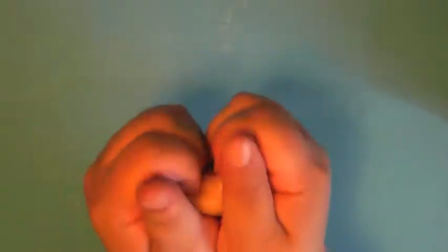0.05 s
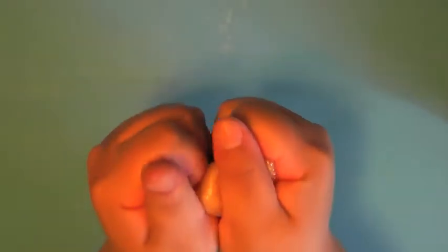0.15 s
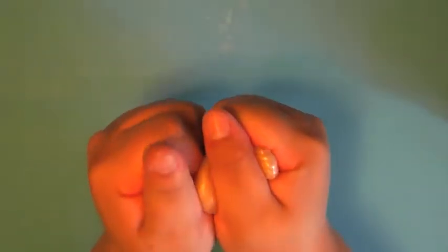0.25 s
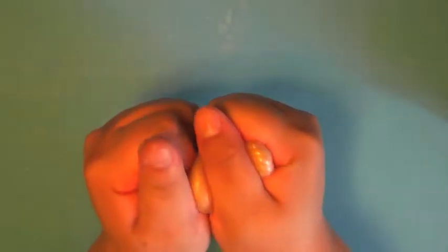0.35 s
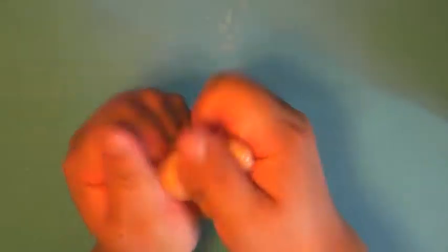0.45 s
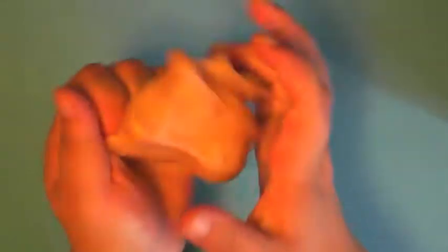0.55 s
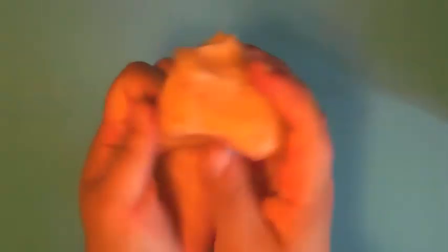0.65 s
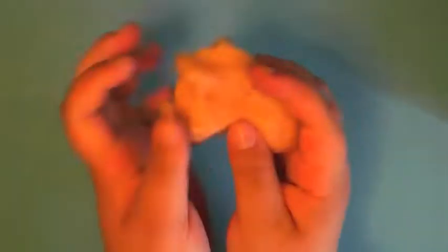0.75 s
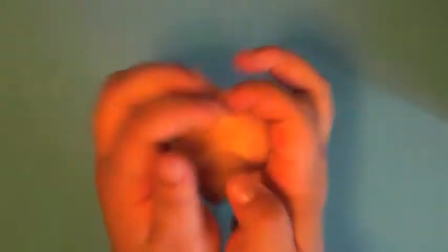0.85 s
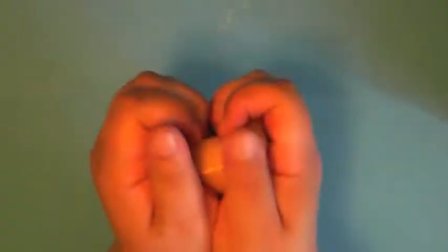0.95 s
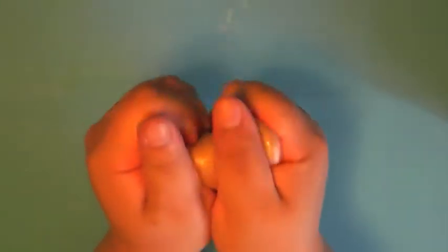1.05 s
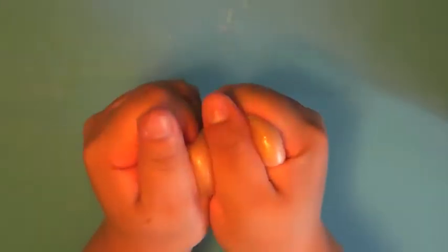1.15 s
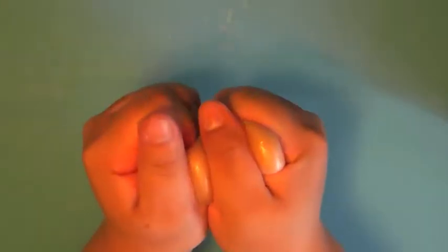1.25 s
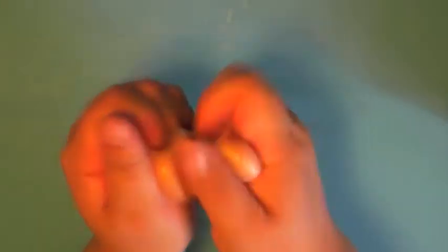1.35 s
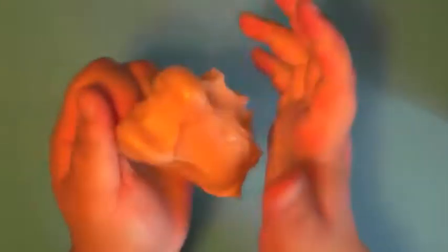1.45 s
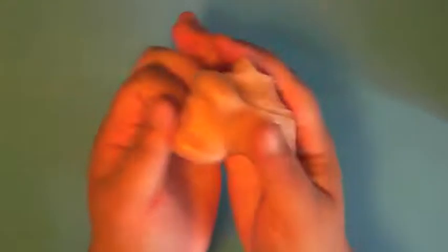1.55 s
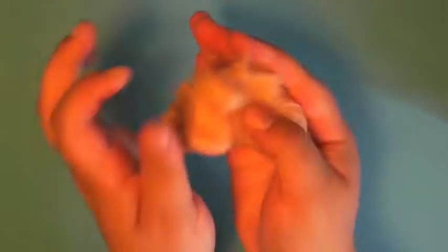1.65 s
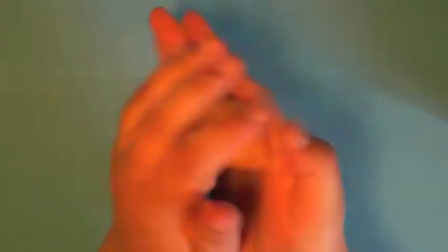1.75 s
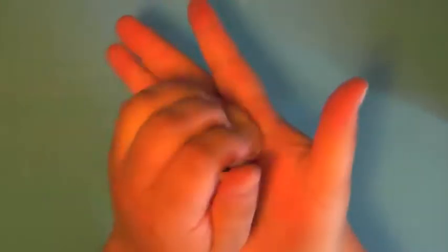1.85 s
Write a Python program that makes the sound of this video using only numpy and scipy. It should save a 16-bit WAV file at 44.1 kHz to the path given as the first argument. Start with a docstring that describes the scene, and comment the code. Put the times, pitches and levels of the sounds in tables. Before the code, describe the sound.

Slime squeezed between two hands very close to a stereo microphone: a dense burst of loud crackling pops early, then soft sticky peeling and squelches, another cluster of snaps, then quieter smears and ticks in a quiet humming room.

```python
"""A quiet room, where two hands squeeze a lump of slime close to the two ports of a microphone.
Trapped bubbles burst as short cracks of ringing noise; the big ones puff air at the ports and hiss out.
Sticky skin slides and peels in soft swells of fine tearing, and air pockets squelch as gliding resonances.
A gain control ducks everything, hum included, just after loud moments and recovers slowly."""
import sys
import numpy as np
from scipy import signal
from scipy.fft import rfft, irfft
from scipy.io import wavfile
from scipy.ndimage import uniform_filter1d

SR = 44100
rng = np.random.default_rng(int(sys.argv[2]) if len(sys.argv) > 2 else 0)


def master(y):
    """Save y as 16-bit WAV."""
    cut = np.clip(np.atleast_2d(y).T, -1, 1)
    pcm = np.round(cut * 32767)  # scale
    wavfile.write(sys.argv[1], SR, pcm.astype(np.int16))


N = 83790


def amp(db):
    """The decibel law: 20 dB is a factor of ten in amplitude."""
    return 10 ** (np.asarray(db) / 20)


def evened(x):
    """Normalization to unit root-mean-square level."""
    return x / np.sqrt(np.mean(x ** 2) + 1e-20)


def add(mix, s, sound):
    """Superposition: sound pressures sum, here from time s onward."""
    part = mix[..., round(s * SR):][..., :sound.shape[-1]]
    part += sound[..., :part.shape[-1]]


def colour(x, points):
    """Spectral shaping: gains in dB, interpolated over log frequency, weight the Fourier spectrum."""
    f, db = np.transpose(points)
    hz = np.fft.rfftfreq(x.shape[-1], 1 / SR)
    gain = amp(np.interp(np.log(hz + 1), np.log(f + 1), db))
    return irfft(rfft(x) * gain, x.shape[-1])


def ring(x, hz, width_hz):
    """A two-pole resonance: the narrower its band, the longer it rings."""
    return signal.lfilter(*signal.iirpeak(min(hz, SR * .4), hz / width_hz, SR), x)


def patchy(x, db, bins, frames):
    """Random modulation: smoothed noise makes louder and quieter clumps over time and pitch."""
    spec = signal.stft(x, SR, nperseg=256)[2]
    clumps = rng.standard_normal(spec.shape[-2:])
    clumps = uniform_filter1d(clumps, size=bins, axis=0)
    clumps = uniform_filter1d(clumps, size=frames, axis=1)
    spec = spec * amp(db * evened(clumps))
    return signal.istft(spec, SR, nperseg=256)[1][..., :x.shape[-1]]


def hum():
    """Diffuse background: coloured noise, wide where the side is strong, plus a narrow-band whine."""
    # spectrum of the room hum: frequency_hz, density_db
    hum_spectrum = [(45, -21), (75, -9.5), (120, -1), (250, -3.5), (470, -4), (530, -13), (720, -6),
                    (1300, -15), (2500, -17), (4000, -18), (5500, -24), (14000, -28.5), (16500, -76)]
    # width of the hum: frequency_hz, side_minus_mid_db
    hum_width = [(60, -4), (200, -3.5), (700, -4), (1600, -2.5), (4400, -39)]
    level_db = -53.5
    whine_hz, whine_width_hz, whine_db = 1640, 200, -62.5
    mid, side = colour(patchy(rng.standard_normal((2, N)), 0.8, bins=3, frames=8), hum_spectrum)
    side = colour(side, hum_width)
    whine = ring(rng.standard_normal((2, N)), whine_hz, whine_width_hz)
    whine = ring(whine, whine_hz, whine_width_hz)
    whine = whine[0] + 0.078 * np.outer([1, -1], whine[1])  # nearly central
    whine = amp(whine_db) * evened(whine)
    return amp(level_db) * np.array([mid + side, mid - side]) / np.std(mid) + whine


def pop(db, hz, ms, crack_db, noise):
    """Impulsive excitation: a brief noise burst rings a damped resonance and adds a broad crack."""
    pitch_q, crack_low_hz, crack_top_hz = 4.1, 3600, 14900
    hold, fall_db = 0.45, 21  # hold in burst lengths, then the fall per burst length
    t = np.arange(len(noise)) / SR
    decay = amp(-fall_db * np.maximum(1000 * t / ms - hold, 0))
    drive = noise * np.minimum(t / .0001, 1) * decay
    crack_band = signal.butter(1, [crack_low_hz, crack_top_hz], "band", fs=SR, output="sos")
    crack = signal.sosfilt(crack_band, drive)
    pitched = ring(ring(drive, hz, hz / pitch_q), hz, 2 * hz / pitch_q)
    both = evened(pitched) + amp(crack_db) * evened(crack)
    return amp(db) * both / abs(signal.hilbert(both)).max()  # the envelope's peak sets the level


def pops():
    """Superposed transients: the bursting bubbles, with faint stray ticks scattered at random times."""
    # bursting bubbles: start_s, peak_db, pitch_hz, length_ms, crack_minus_pitch_db
    bubbles = [(0.0043, -30.5, 4350, 0.59, -32), (0.1008, -32.5, 3860, 0.56, 3),
               (0.1499, -27.5, 3900, 1.4, -9), (0.1596, -36.5, 975, 4.5, -9.5),
               (0.1684, -36.5, 9000, 2.8, 4), (0.184, -34.5, 3520, 1.2, -13), (0.193, -33, 4500, 2.7, -5),
               (0.2024, -30, 8200, 0.99, -10), (0.2137, -25.5, 8000, 1.6, -20), (0.22, -30, 7450, 2, 2),
               (0.2251, -24, 7660, 0.5, -14), (0.2313, -6.5, 9600, 0.66, 1), (0.2451, 0, 8300, 2.36, -1),
               (0.2586, -7, 11000, 0.63, 1), (0.2681, -8, 12100, 0.67, 4), (0.2719, -11.5, 5800, 1.37, -7),
               (0.2943, -13.5, 8300, 1.4, 7), (0.2999, -18, 4300, 0.91, 0), (0.3204, -17.5, 8260, 0.82, -5),
               (0.326, -24, 11000.0, 0.85, -10), (0.3274, -20.5, 4430, 2.1, -16), (0.3345, 1, 8700, 3.9, 9),
               (0.341, -11, 9100, 2.5, 6), (0.3435, -6, 4900, 1.26, 3), (0.384, -15.5, 9300, 1.4, -19),
               (0.4286, -26, 12800, 0.57, -23), (0.5469, -9.5, 8200, 0.4, 8),
               (0.658, -27, 10200.0, 1.2, -1), (0.68, -23.5, 4100, 4.8, 8.5),
               (0.7758, -23, 8600.0, 1.96, -27), (0.7809, -54, 4240, 1.4, 14), (0.8842, -33, 4100, 1.2, 1),
               (0.9599, -30, 4300, 1.1, 0), (0.9848, -35.5, 2620, 2.9, -5), (1.0171, -13.5, 4480, 1.46, -7),
               (1.016, -28, 1200, 1.8, -9.5), (1.0982, -26.5, 9050, 0.81, 4), (1.1192, -24.5, 4320, 1, -13),
               (1.126, -24, 4300.0, 0.63, 20), (1.142, -9.5, 6360, 3.1, 15), (1.1533, -28, 6700, 1.2, 2),
               (1.1566, -12, 3570, 0.8, -4.5), (1.1569, -4.5, 8660, 1.1, 0),
               (1.1684, -11.5, 7200, 0.85, -9), (1.175, -18, 10500, 0.86, 13),
               (1.2539, -16.5, 9150, 2.4, -8), (1.257, -5.5, 8960, 2.7, 4), (1.2696, -7.5, 11400, 1.04, 1),
               (1.39, -37.5, 7640, 4, -1), (1.4407, -32, 4630, 0.65, 0), (1.4822, -39, 3900, 1.5, -14),
               (1.519, -30, 9300, 0.97, 0), (1.5209, -21.5, 9300, 1.35, -3), (1.757, -37, 3900.0, 1.8, -3),
               (1.8166, -29.5, 3870, 2.1, 21), (1.8293, -33.5, 2750, 2, -6), (1.8305, -32, 1070, 1.3, -12)]
    tick_count, tick_db = 55, -44  # the tick peaks spread 5 dB either way
    out, noise = np.zeros(N), rng.standard_normal((len(bubbles), 500))
    for row, z in zip(bubbles, noise):
        add(out, row[0], pop(*row[1:], z))
    for when, size, pitch in rng.random((tick_count, 3)):
        peak_db, pitch_hz = tick_db + 10 * (size - .5), 3500 * 3 ** pitch
        add(out, when * N / SR, pop(peak_db, pitch_hz, .5, 0, rng.standard_normal(500)))
    return out


def room(x):
    """Reverberation: convolution with an exponentially decaying diffuse tail."""
    t60_s, delay_s = 0.2, .004
    t = np.arange(SR // 2) / SR
    tail = rng.standard_normal(len(t)) * amp(-60 * t / t60_s) * (t > delay_s)
    return signal.fftconvolve(x, tail / np.linalg.norm(tail))[:N]


def grains(size):
    """Shot noise: dense tiny tears of uneven size and random sign, over a floor of smooth noise."""
    grains_per_s, spread_db = 7000, 2.4
    big = amp(spread_db * np.minimum(rng.exponential(1, size), 5))
    tears = big * (rng.random(size) < grains_per_s / SR) * rng.choice([-1., 1.], size)
    return tears + 0.31 * rng.standard_normal(size)


def slides():
    """Friction noise: bell-shaped swells of fine tearing, each blending a dull and a bright colour."""
    # sliding and peeling skin: loudest_s, rise_s, fall_s, level_db, brightness (0-1)
    swells = [(.215, 0.022, 0.14, -49.5, 1), (0.553, 0.019, 0.06, -37.5, 0.97),
              (0.586, 0.031, 0.025, -37, 0.87), (.695, 0.017, 0.021, -42, 0.88),
              (.75, 0.0089, 0.02, -45, 0.62), (0.783, 0.031, 0.031, -41.5, 1),
              (.895, 0.016, 0.014, -48.5, 0.95), (1.442, 0.012, 0.014, -37.5, 0.9),
              (1.475, 0.029, 0.021, -37, 0.91), (1.591, 0.011, 0.018, -51.5, 0.9),
              (1.642, 0.042, 0.024, -41.5, 0.87), (1.692, 0.014, 0.016, -42, 0.96),
              (1.824, 0.014, 0.011, -49.5, 0.42)]
    # colour of dull tearing: frequency_hz, density_db
    dull_spectrum = [(180, -37), (300, -9.5), (1770, -3), (2570, -43.5), (3710, -4), (8870, -38),
                     (15400, -31), (16500, -40)]
    # colour of bright tearing: frequency_hz, density_db
    bright_spectrum = [(180, -17.5), (300, -9.5), (1190, -8), (1830, -0.5), (8580, -2.5), (15200, -9.5),
                       (16500, -57)]
    t, dull, bright = np.arange(N) / SR, np.zeros(N), np.zeros(N)
    for s, rise, fall, db, share in swells:
        power = amp(db) ** 2 * np.exp(-((t - s) / np.where(t < s, rise, fall)) ** 2)
        share = np.clip(share, 0, 1)
        dull += (1 - share) * power
        bright += share * power
    dull_tearing = np.sqrt(dull) * evened(colour(grains(N), dull_spectrum))
    return dull_tearing + np.sqrt(bright) * evened(colour(grains(N), bright_spectrum))


def puffs():
    """Pressure pulses: a sharp push then a suck on both ports, a swing across them, and a bass cut."""
    # air puffs of the big bursts, before the bass cut:
    # start_s, thump_db, thump_ms, across, across_ms, lag_ms
    # (across: + = the main push raises the left port, after a small opposite dip)
    bursts = [(0.2316, -23.5, 1.2, 0.13, 0.85, 0.99), (0.2464, -21, 1.8, -0.25, 0.85, 0.44),
              (0.2718, -28.5, 0.99, 0.044, 0.48, 0.69), (0.3352, -11, 3.13, 0.61, 0.43, 0.64),
              (1.1426, -19.5, 1.6, 0.11, 0.64, 1.26), (1.157, -17.5, 0.86, -0.098, 0.56, 0.82),
              (1.258, -15, 1.25, -0.071, 0.32, 1.03)]
    snap_ms, snap_db, bass_cut_hz = 0.21, -1, 42.2  # snap_db is relative to the thump
    rebound = 0.27  # the swing back is slower and shallower
    out, ms = np.zeros((2, N)), np.arange(1500) / SR * 1000
    for s, db, long_ms, across, across_ms, lag_ms in bursts:
        u, v, w = ms / long_ms, ms / snap_ms, (ms - lag_ms) / across_ms
        snap = amp(snap_db) * (v * np.exp(1 - v)) ** 2
        suck = (u * np.exp(1 - u)) ** 3
        thump = amp(db) * (snap - suck)
        w = np.where(w > 1, 1 + rebound * (w - 1), w)
        swing = (1 - w ** 2) * np.exp(-w ** 2 / 2) * np.where(w > 1, rebound, 1)
        push = across * swing * np.minimum(ms / 0.07, 1)
        add(out, s, np.array([thump + push, thump - push]))
    cut = signal.butter(1, bass_cut_hz, "high", fs=SR, output="sos")
    return signal.sosfilt(cut, signal.sosfilt(cut, out))


def hisses():
    """Turbulent outflow: noise through a broad resonance, rising fast and decaying exponentially."""
    # air hissing out: start_s, level_db, t60_s, pitch_hz, width_hz
    outflows = [(0.248, -23, 0.21, 7260, 6200), (0.336, -18, .25, 6300, 6950),
                (0.958, -39.5, 0.04, 2770, 2960), (1.017, -40, 0.17, 4630, 2520),
                (1.144, -30.5, 0.26, 6200, 8600), (1.16, -32.5, 0.19, 6340, 9000),
                (1.259, -28.5, 0.18, 6000, 10500), (1.521, -32.5, 0.038, 7550, 9100)]
    rise_s = 0.0037
    out, t = np.zeros(N), np.arange(SR // 2) / SR
    for s, db, t60, hz, width_hz in outflows:
        air = ring(rng.standard_normal(len(t)), hz, width_hz)
        air = evened(ring(air, hz, 2 * width_hz))
        add(out, s, air * np.minimum(t / rise_s, 1) * amp(db - 60 * t / t60))
    return patchy(out, 0.89, bins=12, frames=2)


def squelches():
    """Cavity resonance: noise in a band that glides as an air pocket between the palms changes size."""
    # air pockets closing or opening: middle_s, half_length_s, level_db, first_hz, last_hz
    pockets = [(0.601, 0.014, -38.5, 1560, 3780), (0.696, 0.014, -44, 1895, 1920),
               (0.701, 0.014, -49, 753, 760), (0.782, 0.019, -44, 1700, 1742),
               (0.797, 0.0063, -41.5, 3870, 4490), (1.268, .006, -34.5, 864, 940),
               (1.46, .013, -36.5, 4164, 3580), (1.479, .006, -40, 1515, 2670),
               (1.635, 0.032, -45.5, 1804, 1694), (1.699, 0.013, -48.5, 977, 1607)]
    resonance_q = 4
    out = np.zeros(N)
    for s, half, db, first_hz, last_hz in pockets:
        u = np.linspace(-2, 2, round(4 * half * SR))  # time in half lengths
        hz = first_hz + (last_hz - first_hz) * np.clip(.5 + u / 2, 0, 1)
        low_pass = signal.butter(2, hz.mean() / resonance_q / SR)
        band = signal.lfilter(*low_pass, rng.standard_normal((2, SR // 5)))[:, :len(u)]
        carrier = np.exp(2j * np.pi * np.cumsum(hz) / SR)
        tone = ((band[0] + 1j * band[1]) * carrier).real  # slow noise moved up to the gliding pitch
        add(out, s - 2 * half, amp(db) * evened(tone) * np.exp(-u ** 2))
    return out


def scene():
    """Stereo by mid and side: quadrature shifts the bursts' phase between ports; hiss treble is wide."""
    # width of the bursts: frequency_hz, side_minus_mid_db
    burst_width = [(700, -12), (2400, -14.5), (8000, -23), (14000, -13)]
    # width of the hiss: frequency_hz, side_minus_mid_db
    hiss_width = [(9000, -52), (12500, -1.5)]
    room_db = -13
    cracks = pops()
    skin = patchy(slides(), 2.7, bins=5, frames=5)
    soft = amp(room_db) * room(cracks) + hisses() + skin + squelches()
    quadrature = signal.hilbert(cracks).imag
    side = colour(quadrature, burst_width) + colour(hisses(), hiss_width)
    return np.array([cracks + soft + side, cracks + soft - side]) + puffs() + hum()


def record(dry):
    """Dynamic compression with slow recovery, a dip in the microphone's response and a band limit."""
    threshold_db, recovery_db_per_s, duck_share = -29.0, 37.5, 0.52
    notch_hz, notch_q, notch_share, edge_hz = 2620, 7.3, 0.36, 16100
    # the backward-looking averages make the ducking follow just after the loud moments
    power = uniform_filter1d((dry ** 2).mean(0), 300, origin=149)
    power_db = 10 * np.log10(abs(power) + 1e-12)
    fall = np.arange(N) * recovery_db_per_s / SR
    held_db = np.maximum.accumulate(power_db + fall) - fall
    over_db = np.maximum(held_db - threshold_db, 0)
    dry = dry - notch_share * ring(dry, notch_hz, notch_hz / notch_q)
    ducked = dry / amp(duck_share * uniform_filter1d(over_db, 200, origin=99))
    band_limit = signal.firwin(255, edge_hz, window=("kaiser", 9), fs=SR)
    return signal.oaconvolve(ducked, band_limit[None], "same")


dry = scene()
out = record(dry)
master(out)
```